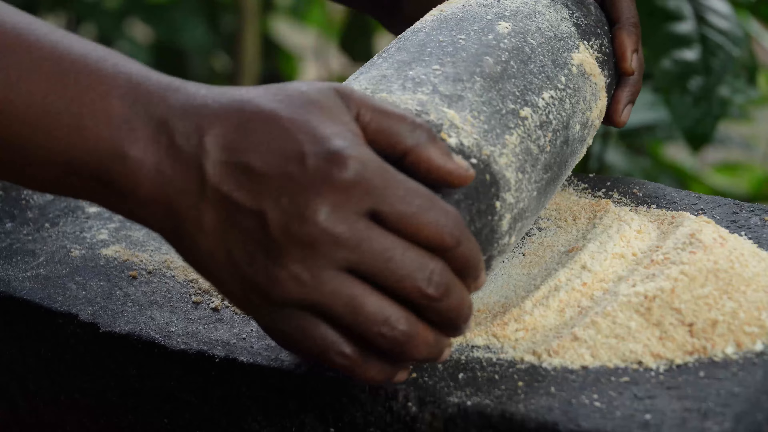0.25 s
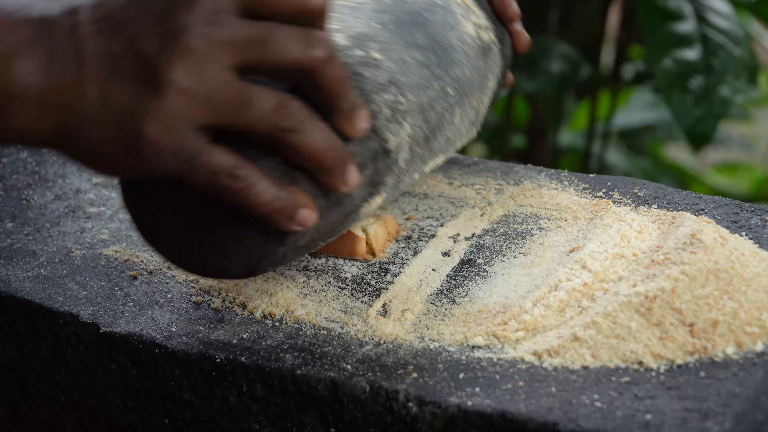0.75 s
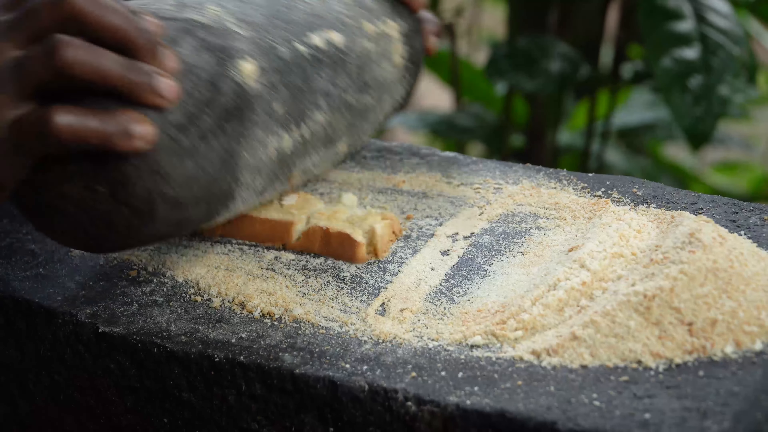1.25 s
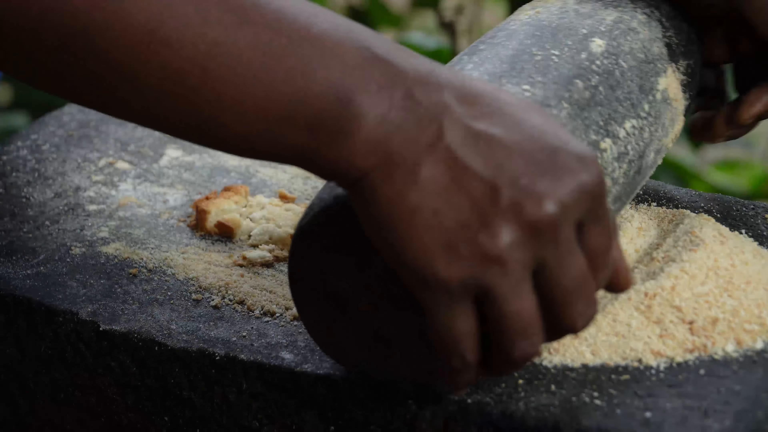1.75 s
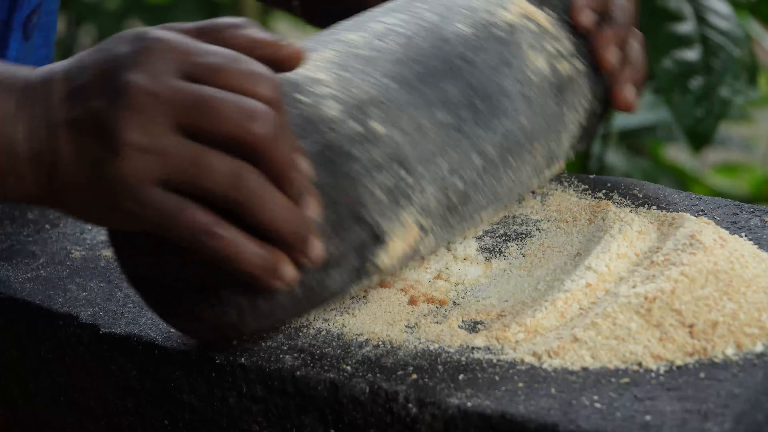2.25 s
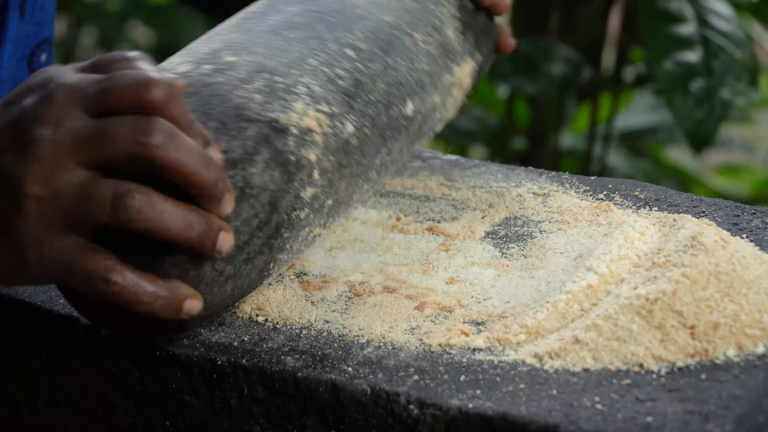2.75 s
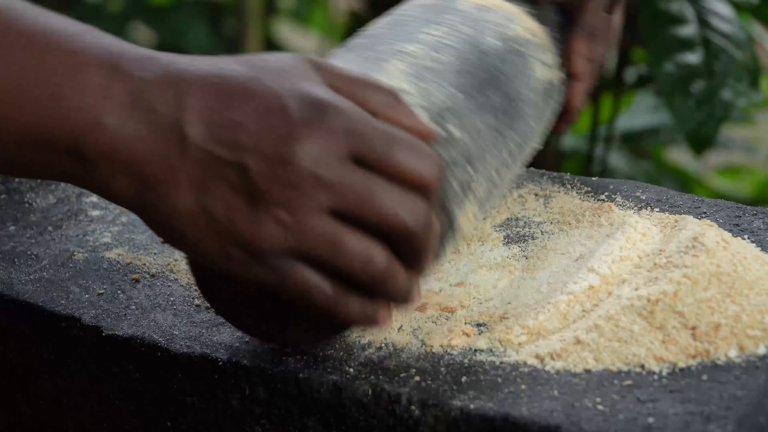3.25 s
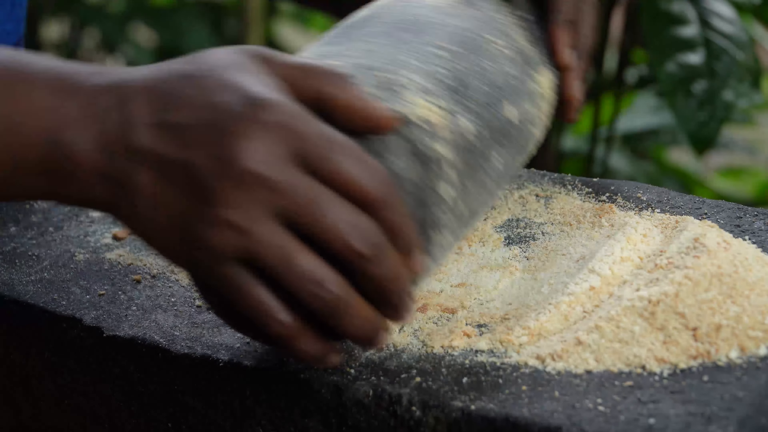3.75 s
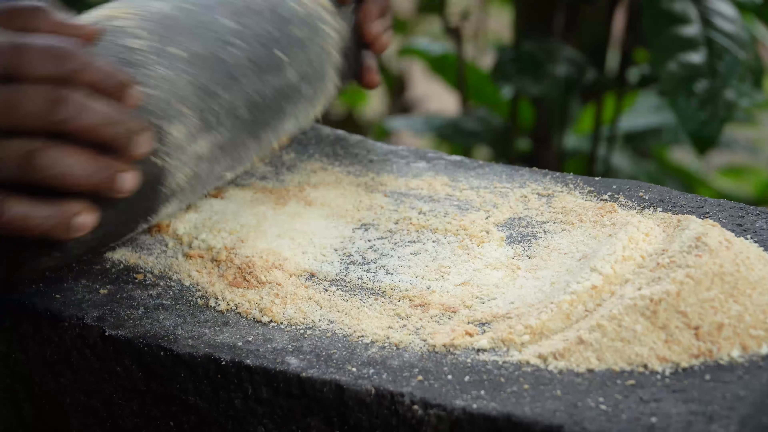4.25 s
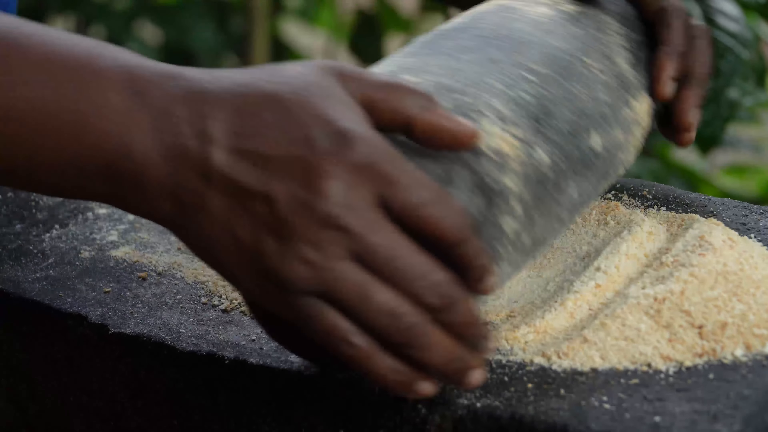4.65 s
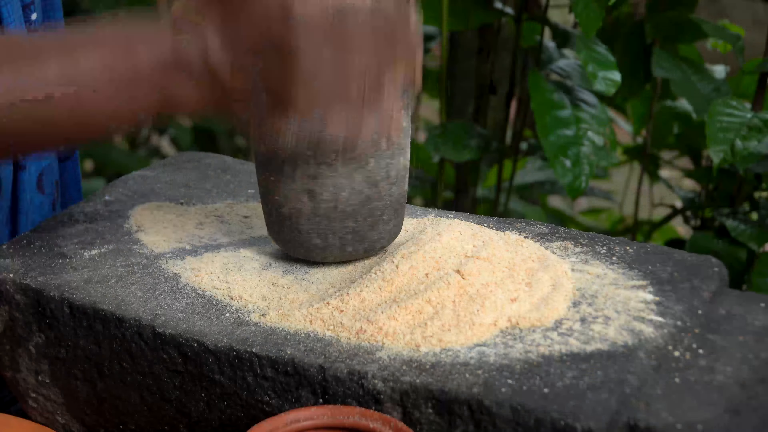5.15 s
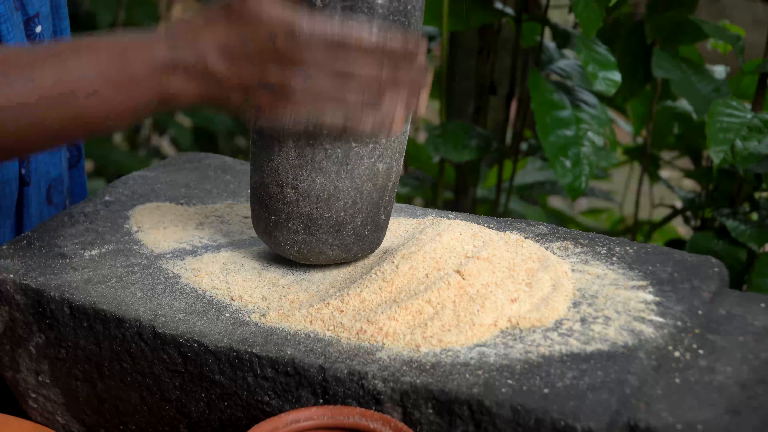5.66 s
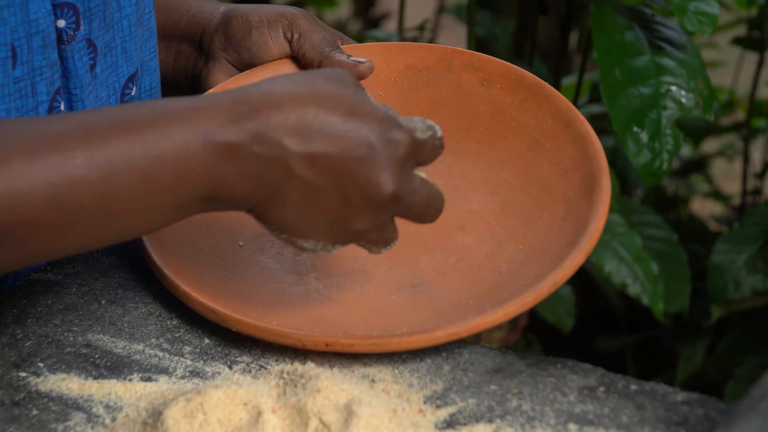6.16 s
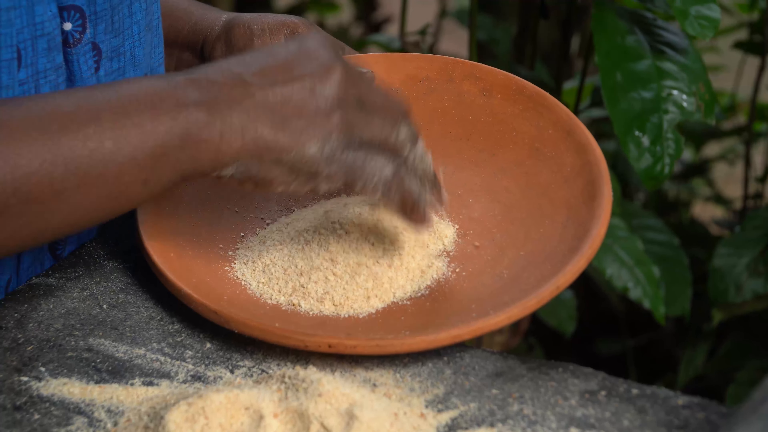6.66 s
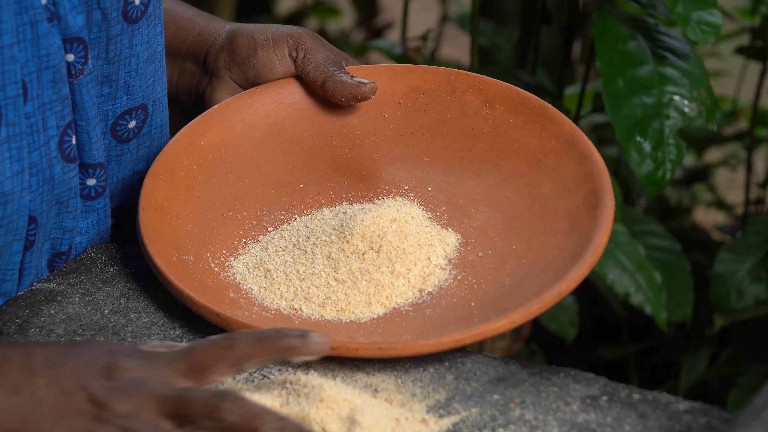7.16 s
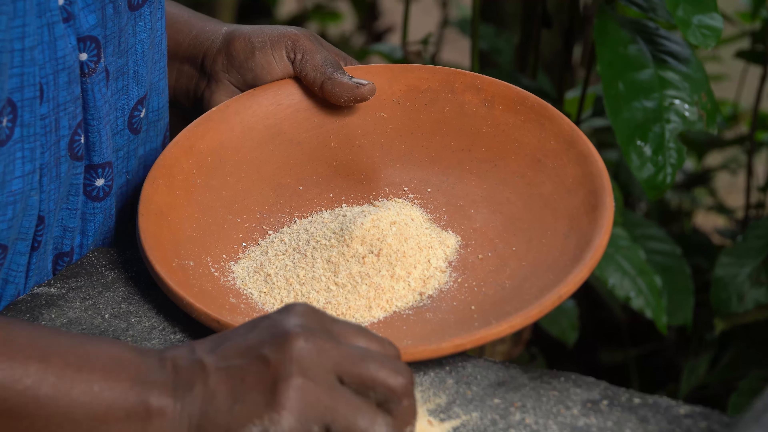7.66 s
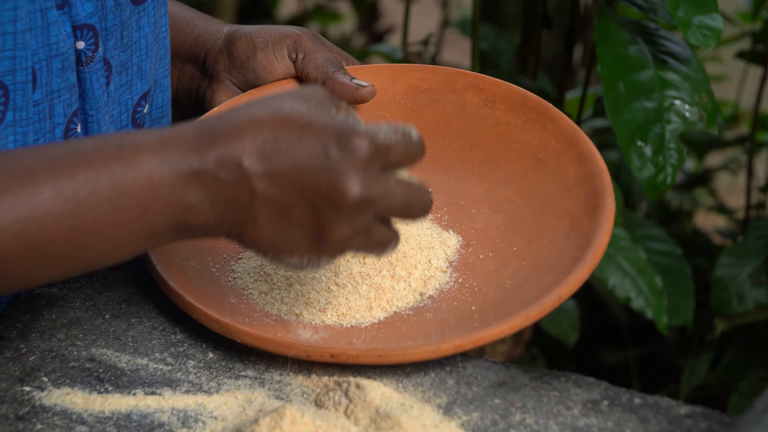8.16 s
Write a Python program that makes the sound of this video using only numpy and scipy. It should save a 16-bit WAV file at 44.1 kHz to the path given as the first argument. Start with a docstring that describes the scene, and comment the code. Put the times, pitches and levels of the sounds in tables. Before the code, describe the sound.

A close outdoor stereo scene begins mid-stroke with a few sharp crust snaps. From about 0.5 s a stone roller moves over dry rusk in uneven strokes, with brittle cracks, gritty crunch and dusty hiss over a subdued stony rumble. A hard, short stone knock lands near 1.2 s, followed by the densest crunching and snapping from 1.25 to 1.6 s. Softer grinding passes continue from 2 to 3 s, a crisper crunch comes around 3.5 s, and finer strokes run to 5 s with a light stone tap near 4.35 s. Five soft palm swishes follow from 5.2 to 6 s. Crumbs then patter faintly on clay, mostly around 6.5 to 7.2 s, with a barely audible stir near 7.75 s. High rasping bush crickets persist, chirping steadily from 3.7 to 5.1 s and after 6.3 s. Distant echoing birds whistle around 2.3 to 3.8 s and from 6.4 s, over thin garden air.

```python
"""Crushing rusk in a garden

A heavy stone roller grinds dry rusk on a slab in strokes; fractures are random clicks, stone is ringing modes.
A palm brushes the roller clean and crumbs trickle into a clay dish, both as filtered grains.
Bush crickets rasp as throbbing partials, birds whistle as bending sines, and garden air is filtered noise."""
import sys
import numpy as np
from scipy import signal
from scipy.fft import rfft, irfft
from scipy.io import wavfile
from scipy.ndimage import uniform_filter1d

SR = 44100
rng = np.random.default_rng(int(sys.argv[2]) if len(sys.argv) > 2 else 0)


def generate_wav(signal):
    """Clip the signal to [-1, 1] and save it as 16-bit WAV at the path in sys.argv[1]."""
    frames = np.transpose(np.atleast_2d(signal))
    scaled = np.clip(frames, -1, 1) * 32767
    pcm = np.round(scaled).astype(np.int16)
    wavfile.write(sys.argv[1], SR, pcm)


N = 370881
TIME = np.arange(N) / SR


def undb(db):
    """Decibels to gain."""
    return 10 ** (np.asarray(db) / 20)


def unit(x):
    """Scale to rms 1."""
    return x / np.sqrt(np.mean(x ** 2))


def curves(table):
    """Join each column of a table by straight lines in time."""
    times, *columns = np.transpose(table)
    return [np.interp(TIME, times, column) for column in columns]


def add(track, s, sound):
    """Mix a sound into a track at time s."""
    start = int(np.clip(s * SR, 0, N - 1))
    track[start:start + len(sound)] += sound[:N - start]


def ring(x, response):
    """Pass a sound through an impulse response."""
    return signal.fftconvolve(x, response)[:N]


def colour(x, spectrum, size=2048):
    """Minimum-phase filter with the given (Hz, dB) outline, scaled to unit energy."""
    hz, db = np.transpose(spectrum)
    bins = np.maximum(np.fft.rfftfreq(size, 1 / SR), 1)
    outline_db = np.interp(np.log(bins), np.log(hz), db)
    # folding the cepstrum makes the filter causal
    cepstrum = irfft(np.log(undb(outline_db)))
    cepstrum[1:size // 2] *= 2
    cepstrum[size // 2 + 1:] = 0
    response = irfft(np.exp(rfft(cepstrum)))
    return ring(x, response / np.linalg.norm(response))


def walk(rate):
    """Smoothly wandering chance with rms 1, drawn anew about rate times a second."""
    hold = max(int(SR / rate), 1)
    steps = np.repeat(rng.standard_normal(N // hold + 1), hold)
    return unit(uniform_filter1d(steps, hold)[:N])


def grains(rate, spread_db):
    """Tiny fractures at random moments, rate per second: many small ones, a few large."""
    size = undb(spread_db * np.minimum(rng.exponential(size=N), 5))
    breaks = rng.random(N) < rate / SR
    return unit(breaks * size * rng.choice([-1, 1], N))


def crackle(spectrum, rate, spread_db, width):
    """Fractures along the length of the roller, each at its own place between left and right."""
    clicks = grains(rate, spread_db)
    place = width * rng.standard_normal(N)
    return unit(np.array([colour(clicks * (1 + side * place), spectrum) for side in (1, -1)]))


def swell(s, rise, fall, shape):
    """Rise to 1 at time s and sink again; a higher shape holds the top longer."""
    u = np.abs(TIME - s) / np.where(TIME < s, rise, fall)
    return np.exp(-np.minimum(u, 6) ** shape)


def swells(table):
    """Bell-shaped rises of level, one for each (s, dB, length) row."""
    return sum(undb(db) * np.exp(-.5 * ((TIME - s) / length) ** 2) for s, db, length in table)


def space(x, t60, wet_db, pan_db=0):
    """Direct sound plus scattered echoes that differ at each ear; positive pan leans left."""
    t = TIME[:int(t60 * SR)]
    tails = rng.standard_normal((2, len(t))) * undb(-60 * t / t60)
    ears = np.broadcast_to(x, (2, N))
    wet = np.array([ring(ear, tail / np.linalg.norm(tail)) for ear, tail in zip(ears, tails)])
    mix = (x + undb(wet_db) * wet) / np.hypot(1, undb(wet_db))
    return mix * undb([[pan_db / 2], [-pan_db / 2]])


# strokes of the roller: (top speed at [s], rise [s], fall [s],
# crunch level [dB], powder hiss level [dB], relative rumble level [dB])
ROLLER_STROKES = [(.02, 0.034, 0.045, -49.5, -45, -76), (.58, 0.16, 0.15, -44.5, -49, -70),
                  (.745, 0.068, 0.1, -35, -45, -57), (.96, 0.13, 0.097, -35.5, -39, -51),
                  (1.269, 0.069, 0.036, -33.5, -35, -49), (1.45, 0.16, 0.17, -32, -28.5, -46),
                  (1.63, .05, 0.058, -56, -48, -47.5), (2.165, .21, 0.077, -45.5, -41, -51),
                  (2.335, 0.047, 0.081, -43.5, -38.5, -47), (2.79, 0.061, .065, -42, -39, -52),
                  (2.945, 0.053, 0.12, -44, -43, -51), (3.3, 0.088, 0.1, -53, -50, -61),
                  (3.47, 0.059, 0.1, -37, -34, -57), (3.655, 0.054, 0.13, -33.5, -32, -48),
                  (4.12, .12, 0.093, -47, -47.5, -54.5), (4.263, 0.015, 0.034, -43.5, -36.5, -53),
                  (4.52, 0.078, .12, -39, -36.5, -46.5), (4.97, 0.11, 0.086, -40.5, -47.5, -51.5)]
STROKE_SHAPE = 3.6  # 2 is a bell; higher holds the top speed longer
RUMBLE_LAW = .65  # rumble grows as speed to this power
RESTING_CRUNCH_DB, RESTING_RUMBLE_DB = -55.5, -64  # the roller never stands quite still
LIFT_S = 5.17  # the roller leaves the crumbs


def strokes():
    """Each stroke speeds up and slows down; crunch, powder and rumble follow its speed."""
    # powers add up where strokes overlap
    crunch, powder, rumble = undb(RESTING_CRUNCH_DB) ** 2, 0, undb(RESTING_RUMBLE_DB) ** 2
    for s, rise, fall, crunch_db, powder_db, rumble_db in ROLLER_STROKES:
        speed = swell(s, rise, fall, STROKE_SHAPE)
        crunch = crunch + (undb(crunch_db) * speed) ** 2
        powder = powder + (undb(powder_db) * speed) ** 2
        rumble = rumble + (undb(rumble_db) * speed ** RUMBLE_LAW) ** 2
    contact = np.clip((LIFT_S - TIME) / 0.071 + .5, 0, 1)
    return np.sqrt([crunch, powder, rumble]) * contact


# tone of breaking crumbs: (frequency [Hz], level [dB])
CRUMB_TONE = [(60, -59.5), (300, -36.5), (700, -13.5), (1200, -16.5), (2000, -0.5), (3000, 0.5), (4000, 3),
              (5500, -0.5), (8000, -1), (11000, -7.5), (16000, -13.5)]
# tone of powder: (frequency [Hz], level [dB])
POWDER_TONE = [(100, -56.5), (2000, -28.5), (5000, 0), (8000, 1.5), (10000, 2), (12000, -3.5), (14000, -2),
               (16000, -5.5)]
# pieces that cave in: (time [s], bell width [s], cracks level [dB], lower-pitched crust level [dB])
CAVE_INS = [(0.008, .015, -39, -70), (0.519, 0.0093, -35, -46), (0.688, 0.0089, -37.5, -51),
            (0.844, .022, -27, -42.5), (0.975, 0.011, -32.5, -35), (1.013, 0.011, -29.5, -47),
            (1.268, .012, -26.5, -56), (1.361, 0.0276, -22.5, -39.5), (1.482, 0.017, -24.5, -45),
            (2.822, .01, -47, -60), (3.52, 0.012, -26.5, -53)]


def crushing(crunch_gain, powder_gain):
    """Crust breaks coarsely, pieces cave in with a burst of cracks, crumbs fracture in clumps, powder hisses."""
    clumps = undb(1.4 * walk(130))
    crust_tone = [(100, -56), (600, -20), (1100, -3.5), (1700, -1.0), (2600, 1.5), (6000, -26)]
    crust_bursts = swells([(s, db, length) for s, length, _, db in CAVE_INS])
    crack_bursts = swells([(s, db, length) for s, length, db, _ in CAVE_INS])
    crust = crackle(crust_tone, rate=5000, spread_db=3.5, width=.2)
    crust *= crust_bursts + undb(-16.5) * crunch_gain
    crunch = crackle(CRUMB_TONE, rate=7000, spread_db=3.0, width=0.33) * crunch_gain * clumps
    powder = crackle(POWDER_TONE, rate=7500, spread_db=3.0, width=.45) * powder_gain * clumps
    cracks = crackle(CRUMB_TONE, rate=8300, spread_db=3.0, width=0.29) * crack_bursts
    return space(crust + crunch + powder + cracks, t60=.03, wet_db=-13, pan_db=1.8)


# single sharp snaps: (time [s], peak before echoes [dB])
CRUST_SNAPS = [(.0094, -13), (.0304, -18), (.4998, -18), (0.5078, -19), (.6769, -21), (.9692, -15.5),
               (1.2749, -12), (1.3492, -19), (1.5136, -11), (1.5254, -17), (1.5666, -14), (1.5767, -15),
               (1.6317, -25), (2.6547, -21.5), (3.4185, -19), (3.6874, -15), (4.2651, -22)]


def snaps():
    """Hard bits of crust break with a single click: a sharp first break, then fast-fading splinters."""
    clicks = np.zeros(N)
    t = TIME[:SR // 200]
    tone = [(100, -43), (600, -14.5), (2000, 2.5), (6000, 5), (15000, -7), (17000, -30)]
    for s, db in CRUST_SNAPS:
        splinters = .4 * rng.standard_normal(len(t)) * np.exp(-t / .0004)
        splinters[0] = 1  # the first break
        click = colour(splinters, tone)
        add(clicks, s, undb(db) * click / np.abs(click).max())
    return space(clicks, t60=.05, wet_db=-9, pan_db=1.2)


# ring of slab and roller: (frequency [Hz], relative level [dB], t60 [s])
STONE_MODES = [(271, -11.5, 0.088), (409, -19, 0.038), (566, -2.5, .06), (708, -4.5, 0.065),
               (825, 8, 0.045), (975, -9.5, .05), (1078, 5.5, 0.046), (1260, -6, .06), (1384, -1, 0.066),
               (1540, -7, .11), (1850, -6, 0.037), (2070, -18, 0.092), (2464, -0.5, .18),
               (2623, -14.5, .15), (2950, -10.5, .15)]


def stone(contact_db):
    """Response of the stones to a tap: a short contact pulse and their decaying modes."""
    t = TIME[:SR // 4]
    modes = np.zeros(len(t))
    for hz, db, t60 in STONE_MODES:
        decay = np.exp(-np.log(1000) * t / t60)
        modes += undb(db) * np.cos(2 * np.pi * hz * t) * decay
    contact = undb(contact_db) * np.cos(2 * np.pi * 1200 * t) * np.exp(-t / 0.00066)
    return signal.sosfilt(signal.butter(3, 300, "high", fs=SR, output="sos"), modes + contact)


# the roller lands and rocks on the slab:
# (time [s], peak before echoes [dB], contact softness as cut-off [Hz])
LANDINGS = [(1.1757, -9.5, 1870), (1.1808, -7.5, 1980), (1.1823, -8.5, 1960), (1.189, -19, 1150),
            (1.197, -14, 1540), (4.3445, -28.5, 836), (4.351, -44, 605), (4.355, -27.5, 730)]


def roller(rumble_gain):
    """Grit under the rolling stone keeps its modes rumbling; landings strike the same modes."""
    grit_tone = [(100, 1.5), (180, 5.0), (260, 6.0), (400, 2.0), (560, 2.5), (900, -9), (2500, 4)]
    grit = colour(grains(rate=1500, spread_db=1.5), grit_tone)
    rumble = unit(ring(grit, stone(contact_db=0))) * rumble_gain * undb(1.14)
    blows, tap = np.zeros(N), stone(contact_db=20)
    for s, db, soft_hz in LANDINGS:
        blow = signal.sosfilt(signal.butter(5, soft_hz, fs=SR, output="sos"), tap)
        add(blows, s, undb(db) * blow / np.abs(blow).max())
    return space(rumble + blows, t60=.15, wet_db=-14, pan_db=.3)


# a palm sweeps down the dusty roller: (time [s], level [dB], bell width [s])
PALM_SWEEPS = [(5.21, -37, 0.031), (5.385, -41.5, 0.052), (5.58, -37, 0.04), (5.77, -44.5, 0.052),
               (5.96, -39, 0.044)]
# hiss of the palm: (frequency [Hz], level [dB])
PALM_TONE = [(100, -50), (700, -25), (1500, -13), (2500, -1), (4000, -3), (6000, -5), (9000, -5.5),
             (12000, -9.5), (15500, -9)]


def brushing():
    """Skin drags fine powder over the stone: dense grains swell with each sweep."""
    hiss = crackle(PALM_TONE, rate=16000, spread_db=2.5, width=0.31)
    return space(hiss * swells(PALM_SWEEPS), t60=0.048, wet_db=-13, pan_db=2.0)


# pinches of crumbs let go and gathered: (height at [s], rise [s], fall [s], level [dB])
CRUMB_PINCHES = [(6.48, .1, .15, -56.5), (6.71, 0.067, 0.15, -50), (6.97, 0.14, 0.29, -49),
                 (7.75, 0.36, .35, -61)]


def pouring():
    """Fine crumbs patter on clay: random impacts, coloured and swelling with the flow."""
    flow = sum(undb(db) * swell(s, rise, fall, shape=1.8) for s, rise, fall, db in CRUMB_PINCHES)
    clay_tone = [(300, -59.0), (800, -15.5), (1300, -0.5), (2500, 4.5), (5000, -3.5), (9000, -10.0),
                 (16000, -15.5)]
    patter = colour(grains(rate=4000, spread_db=3.0), clay_tone)
    return space(patter * flow, t60=0.046, wet_db=-1)


# partials of a wing, whose resonance favours the fourth: one row, multiples 1 to 6 (level [dB])
WING_PARTIALS = [-13, -19, -29.5, 1, -28.5, -29]


def chirp(hz, length, fall, rasp, tooth_hz):
    """One wing stroke: a quickly starting, sinking tone that throbs as the file passes the scraper."""
    t = TIME[:int(length * SR)]
    u = t / length
    start, pace, wander = rng.standard_normal(3)
    teeth = tooth_hz * np.exp(.25 * pace) * t * (1 + .12 * wander * u)
    throb = 1 + rasp * np.cos(2 * np.pi * teeth + start)
    phase = 2 * np.pi * hz * np.cumsum(1 + fall * (.5 - u)) / SR
    tone = np.zeros(len(t))
    for k, db in enumerate(WING_PARTIALS, 1):
        partial = undb(db) * np.sin(k / 4 * phase)  # hz is the fourth partial
        tone += partial * (throb if k > 1 else 1)
    return np.minimum(t / .005, 1) * (1 - u) ** 0.8 * tone


# bouts of steady chirping nearby: (start [s], end [s], period [s], relative level [dB], pitch [Hz])
CHIRP_BOUTS = [(3.715, 5.15, .1165, -29, 8590), (6.279, 8.4, .1195, -31.5, 8520)]
CHIRP_JITTER_S, CHIRP_SPREAD_DB, CHIRP_SPREAD_HZ = .005, 0.96, 71.2


def bout_chirps():
    """Nearly even chirps through each bout, as (s, dB, Hz) rows."""
    rows = []
    for start, end, period, db, hz in CHIRP_BOUTS:
        beats = np.arange(start, end, period)
        for s, (late, size, detune) in zip(beats, rng.standard_normal(size=(64, 3))):
            rows.append((s + CHIRP_JITTER_S * late, db + CHIRP_SPREAD_DB * size, hz + CHIRP_SPREAD_HZ * detune))
    return rows


# lone chirps that stand out from the chorus: (time [s], relative level [dB], pitch [Hz])
LONE_CHIRPS = [(.3425, -27.5, 8360), (.717, -28, 8350), (1.0819, -32.5, 8410), (1.7895, -32, 8570),
               (1.8994, -31, 8550), (2.205, -28.5, 8630), (2.506, -26, 8310), (2.862, -27, 8570),
               (3.0611, -32, 8380), (3.239, -32.5, 8620), (3.3353, -29, 8680)]
# insects further off: (time [s], chorus level [dB], pitch of the strongest partial [Hz])
FAR_CHORUS = [(0, -45.5, 8230), (1.1, -42.5, 8150), (1.8, -42.5, 8310), (3.1, -41, 8390),
              (3.7, -39.5, 8424), (4.2, -40, 8417), (5.14, -37.5, 8410), (5.19, -48, 8270),
              (6.2, -45, 8310), (6.25, -39, 8355), (7.3, -38.5, 8323), (8.4, -38, 8285)]
# blur of the chorus around the wing partials: (frequency [Hz], level [dB])
CHORUS_BLUR = [(1000, -54.5), (1850, -21.5), (2130, -4.5), (2450, -21), (3500, -36), (4250, -17.5),
               (5200, -35), (7300, -30), (8000, -4), (8650, 1), (9500, -25), (11500, -39.5), (12600, -25.5),
               (14000, -47.5)]


def bush_crickets():
    """A few near singers over a chorus of overlapping wing strokes that blur in the leaves."""
    near, far = np.zeros(N), np.zeros(N)
    for s, db, hz in LONE_CHIRPS + bout_chirps():
        add(near, s, undb(db - 6.0) * chirp(hz, length=.085, fall=.004, rasp=.5, tooth_hz=224))
    chorus_db, pitch = curves(FAR_CHORUS)
    for s in np.arange(0, TIME[-1], 1 / 40):  # 40 strokes a second
        late, detune, size = rng.standard_normal(3)
        hz = pitch[int(s * SR)] + 120 * detune
        stroke = chirp(hz, length=.06, fall=0.0091, rasp=0.82, tooth_hz=188.0)
        add(far, s + .015 * late, undb(2 * size) * stroke)
    blur = colour(rng.standard_normal(N), CHORUS_BLUR) * undb(1.8 * walk(200))
    chorus = (unit(far) + undb(-2.5) * blur) * undb(chorus_db)
    song = space(near, t60=.25, wet_db=-2, pan_db=1) + space(chorus, t60=0.23, wet_db=2.5, pan_db=0.3)
    return signal.sosfilt(signal.butter(4, 1200, "high", fs=SR, output="sos"), song)


# one bird repeats a short rising call: (time [s], relative level [dB])
RISING_CALLS = [(2.273, -47.5), (2.49, -46.5), (2.72, -47), (3.128, -48.5), (3.553, -48)]
CALL_S, CALL_FROM_HZ, CALL_TO_HZ = .1, 1490, 1790
# whistles of other birds: (time [s], length [s], start pitch [Hz], end pitch [Hz], relative level [dB])
WHISTLES = [(2.79, .29, 1880, 2028, -43), (2.878, 0.13, 2653, 2727, -43.5), (3.17, 0.31, 2110, 2222, -41),
            (3.601, 0.23, 2113, 2070, -41), (6.441, .25, 3596, 3212, -39.5), (6.852, .18, 4170, 4400, -52),
            (7.03, .22, 4850, 5520, -54.5), (7.24, .073, 5900, 5570, -52.5), (7.249, .075, 2915, 2730, -48),
            (7.72, .15, 4920, 4750, -54), (8.19, 0.11, 4430, 4490, -57.5), (8.321, 0.096, 4710, 4720, -51)]


def birds():
    """Whistles swell, bend from one pitch to another and flutter in pitch, echoing among the trees."""
    song = np.zeros(N)
    flutter_hz = 30 * walk(200)
    calls = [(s, CALL_S, CALL_FROM_HZ, CALL_TO_HZ, db) for s, db in RISING_CALLS]
    for s, length, start_hz, end_hz, db in calls + WHISTLES:
        u = np.linspace(0, 1, int(length * SR))
        bend = np.sin(np.pi * u / 2) ** 2
        flutter = np.roll(flutter_hz, -int(s * SR))[:len(u)]
        hz = start_hz + (end_hz - start_hz) * bend + flutter
        breath = np.abs(np.sin(np.pi * u ** 0.91)) ** 0.62
        add(song, s, undb(db + 4.0) * breath * np.sin(2 * np.pi * np.cumsum(hz) / SR))
    return space(song, t60=1.3, wet_db=6)


def air(spectrum, db, side_db):
    """Soft hiss of distant foliage and insects: slowly wavering noise, wider in the treble."""
    mid = colour(rng.standard_normal(N), spectrum)
    side_noise = colour(rng.standard_normal(N), [(100, -10), (1000, -9.5), (4000, -5)])
    side = colour(side_noise, spectrum)
    return (mid + undb(side_db) * side * np.array([[1], [-1]])) * undb(db + .5 * walk(3.1))


# garden air by the slab: (frequency [Hz], level [dB])
SLAB_AIR = [(25, -47.5), (70, -22.5), (130, -23.5), (250, -11), (500, -1.5), (900, 1), (1800, 2.5),
            (3000, -2.5), (4300, -1), (5500, -7.5), (7500, -4), (10000, -10.5), (16000, -13)]
# garden air by the dish: (frequency [Hz], level [dB])
DISH_AIR = [(200, -73.5), (480, -42), (600, -25), (900, -16), (1300, -3), (2200, -1.5), (3200, 3.5),
            (4300, 0.5), (5500, 0), (7500, 0), (9800, -5.5), (11500, -8.5), (12600, -6.5), (15500, -11)]
DISH_S = 6.22  # the work moves to the dish


def garden():
    """Air by the slab crossfades to thinner air by the dish."""
    by_dish = np.clip((TIME - DISH_S) / 0.037 + .5, 0, 1)
    slab = air(SLAB_AIR, db=-51.0, side_db=-2.5)
    dish = air(DISH_AIR, db=-52.5, side_db=-4.0)
    return (1 - by_dish) * slab + by_dish * dish


def scene():
    """Mix the stone work, the hand and crumbs, the animals and the garden air."""
    crunch, powder, rumble = strokes()
    work = crushing(crunch, powder) + snaps() + roller(rumble)
    return work + brushing() + pouring() + bush_crickets() + birds() + garden()


TOP_HZ = 15800


def record(dry):
    """The recorder cuts the top with a steep low-pass."""
    return signal.sosfilt(signal.ellip(10, .2, 70, TOP_HZ, fs=SR, output="sos"), dry)


dry = scene()
out = record(dry)
generate_wav(out)
```